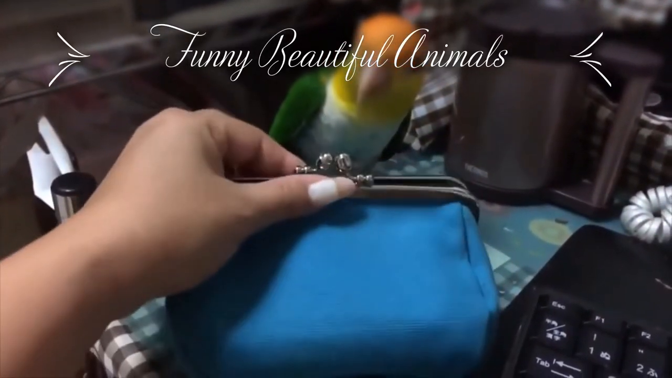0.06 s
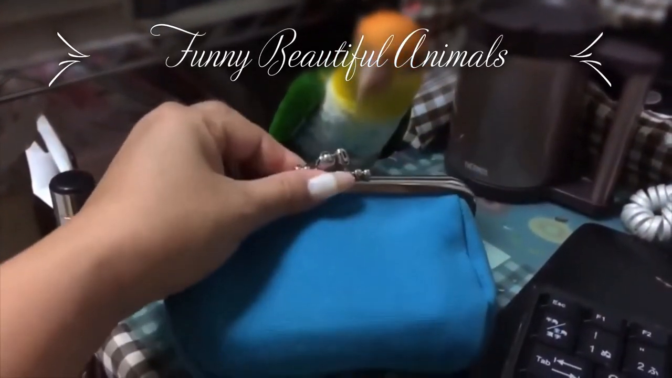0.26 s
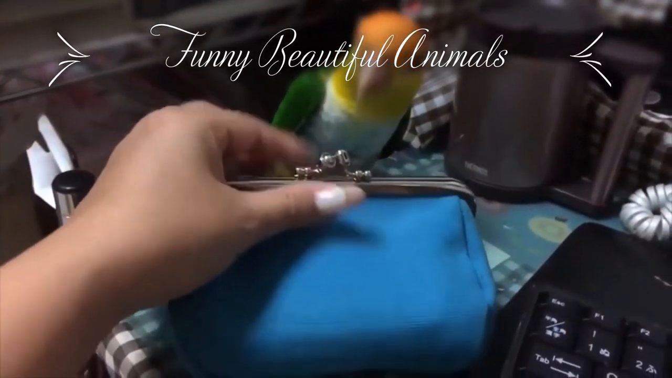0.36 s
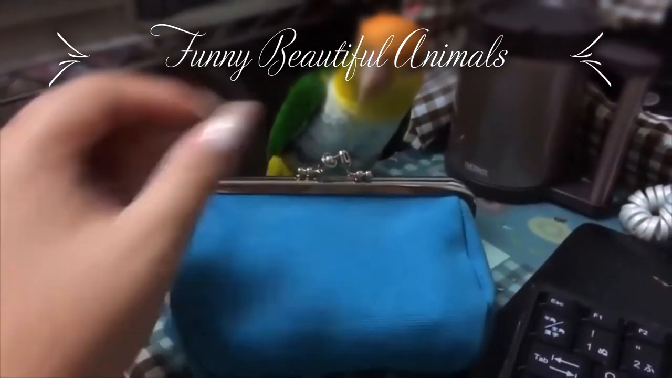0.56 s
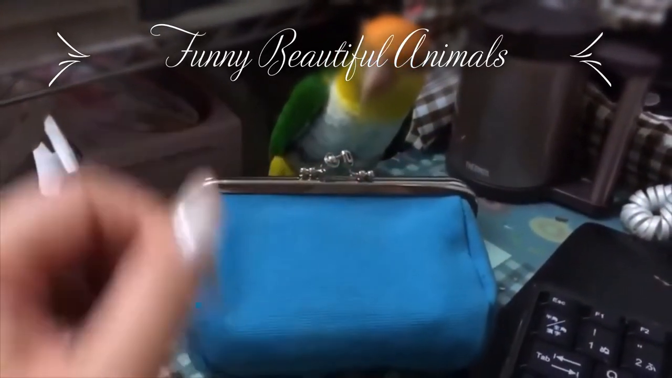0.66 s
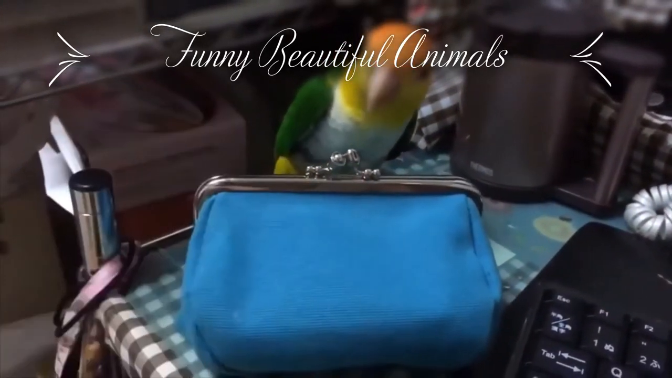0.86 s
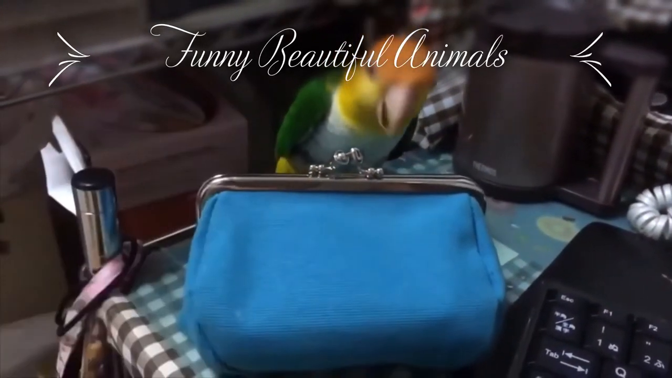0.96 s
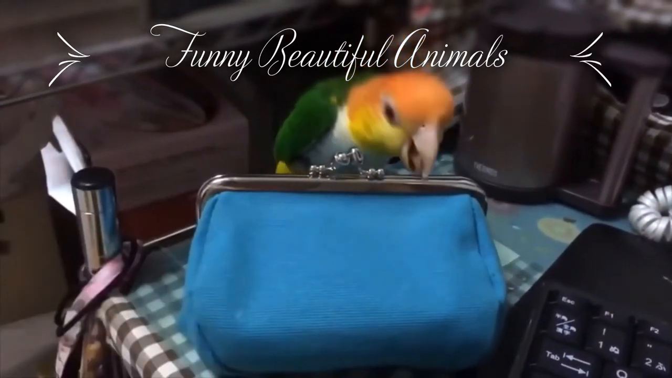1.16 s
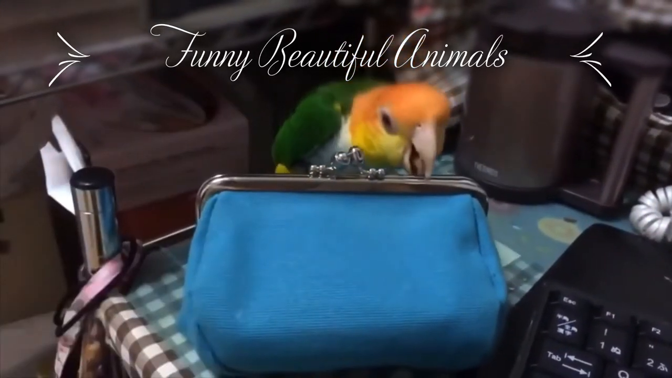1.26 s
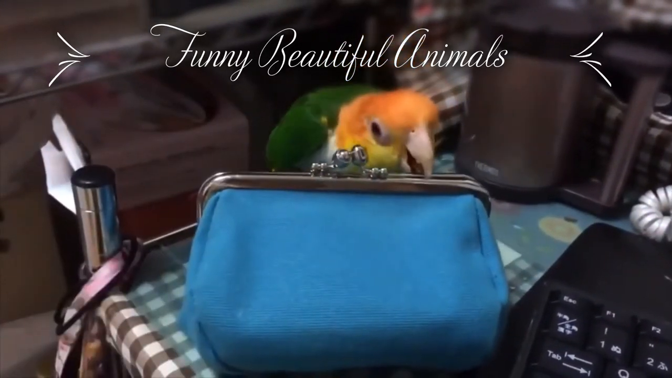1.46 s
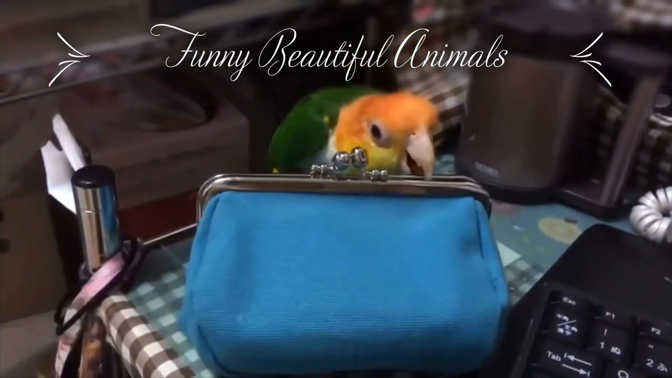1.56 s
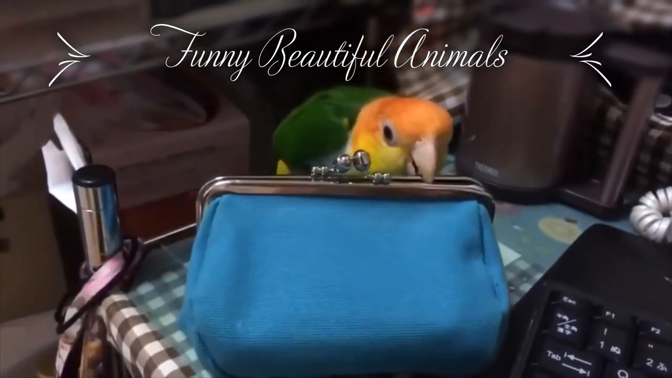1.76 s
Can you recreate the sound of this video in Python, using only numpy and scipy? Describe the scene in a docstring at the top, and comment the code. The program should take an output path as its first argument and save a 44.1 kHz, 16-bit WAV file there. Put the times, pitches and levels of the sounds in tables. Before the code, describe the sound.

A metal purse clasp ticks under fingers, then snaps shut with one loud, bright crack and short rattle; about a second later come faint ticks as a parrot touches it. Close microphone, small furnished room, low fan hum.

```python
"""A fan motor hums low over its airflow noise while the metal clasp of a cloth purse ticks under fingers.
The clasp scrapes, snaps shut and rattles, and later ticks faintly as a small parrot touches it.
Contacts are sums of dying sines, and a small furnished room answers them with fading noise.
The hum is a few wavering tones; airflow and one soft rustle are shaped noise."""
import sys
import numpy as np
from scipy import signal
from scipy.io import wavfile
from scipy.ndimage import uniform_filter1d

SR = 44100
rng = np.random.default_rng(int(sys.argv[2]) if len(sys.argv) > 2 else 0)


def generate_wav(sig):
    """Save sig (samples, or channels by samples) to the path in sys.argv[1] as 16-bit PCM at SR."""
    pcm = np.round(np.clip(np.atleast_2d(sig).T, -1, 1) * 32767).astype(np.int16)
    wavfile.write(sys.argv[1], SR, pcm)


def level_to_linear(level):
    """Convert decibel levels to linear amplitude factors, elementwise."""
    exponent = np.asarray(level, float) / 20
    return 10 ** exponent


N = 79380  # length in samples

# Lasting rings of the clasp frame. Each row: pitch in Hz, level in dB, time to fall by 60 dB in seconds.
FRAME_RINGS = [(1000, -34.5, .14), (2092, -36, .13), (2210, -38.5, .14), (2440, -33.5, .12),
               (3400, -32, .13), (4100, -32.5, 0.14), (4600, -35, 0.098), (5100, -35.5, .11),
               (5700, -36.5, .11), (7270, -40, .11), (8500, -34, .10), (9250, -36, .09),
               (10800, -34.5, .13), (14000, -37.5, .08)]


def evened(x):
    """Scales a sound to an rms (average strength) of 1."""
    return x / np.sqrt(np.mean(x ** 2) + 1e-20)


def read(points, hz):
    """Reads a table at any pitch, on a log-frequency axis."""
    table_hz, value = np.transpose(points)
    return np.interp(np.log(hz + 1), np.log(table_hz + 1), value)


def add(mix, start_s, sound):
    """Mixes a sound in at its start time."""
    part = mix[round(start_s * SR):][:len(sound)]
    part += sound[:len(part)]


def hum():
    """Motor hum: tones at multiples of one wavering pitch, each fluttering a little in level."""
    # Path of the hum. Each row: time in seconds, base pitch in Hz, level in dB.
    hum_path = [(0.0, 59.8, -53.5), (0.034, 59, -47), (0.09, 58.68, -58), (0.124, 58.44, -48),
                (0.2, 58.81, -51.5), (0.223, 58.58, -46.5), (0.26, 58.6, -61), (0.28, 58.4, -46),
                (0.3, 58.56, -70), (0.334, 58.7, -54.5), (0.38, 58.3, -65), (0.55, 58.58, -55),
                (0.586, 58.44, -61), (0.6, 58.6, -57.5), (0.696, 58.8, -59.5), (0.746, 58.72, -50),
                (0.802, 58.38, -59), (0.822, 58.07, -51.5), (0.966, 58.53, -51), (1.002, 58.56, -61),
                (1.036, 58.45, -55), (1.102, 58.44, -54.5), (1.122, 58.95, -61.5), (1.258, 58.08, -61.5),
                (1.272, 59.65, -70), (1.308, 58.15, -54.5), (1.338, 58.33, -56.5), (1.614, 58.35, -48.5),
                (1.694, 58.64, -58.5), (1.8, 59.5, -51)]
    # Tones of the hum. Each row: multiple of the base pitch, level in dB.
    hum_orders = [(1, -0.5), (2, -10.5), (2.055, -9.5), (4.1, -20.5), (5.1, -21), (6.15, -23.5)]
    flutter_db = 2.5  # rms
    t = np.arange(N) / SR
    path_s, path_hz, path_db = np.transpose(hum_path)
    phase = 2 * np.pi * np.cumsum(np.interp(t, path_s, path_hz)) / SR
    tones = np.zeros(N)
    for multiple, order_db in hum_orders:
        slow_noise = uniform_filter1d(uniform_filter1d(rng.standard_normal(N), 900), 900)
        level = level_to_linear(order_db + flutter_db * evened(slow_noise))
        tones += level * np.cos(multiple * phase)
    return np.sqrt(2) * level_to_linear(np.interp(t, path_s, path_db)) * tones


def drifting_spectrum():
    """Random noise as frames of frequencies; patches and the whole level drift slowly."""
    patch_db, swell_db = 1.5, 0.66  # rms drift of the patches and of the whole level
    frames = N // 256 + 5
    real, imaginary, patches = rng.standard_normal((frames, 513, 3)).T
    swell = evened(uniform_filter1d(rng.standard_normal(frames), 30))
    # smooth over neighbouring pitches, then over time
    patches = evened(uniform_filter1d(uniform_filter1d(patches, 10, 0), 10, 1))
    return (real + 1j * imaginary) * level_to_linear(patch_db * patches + swell_db * swell)


def shaped(spectrum, shape):
    """Weights each frequency of the noise and turns it into sound of rms 1."""
    return evened(signal.istft(spectrum * shape[:, None], nperseg=1024, noverlap=768)[1][:N])


def air(spectrum):
    """Airflow noise plus the hollow bands that the fan housing brings out."""
    # Colour of the airflow. Each row: frequency in Hz, relative level in dB per Hz.
    air_colour = [(20, -12.5), (45, -2.5), (90, -2), (150, -8.5), (300, -11), (500, -12.5), (770, -17.5),
                  (1150, -14.5), (1900, -18), (2500, -20.5), (3100, -28.5), (6000, -32.5), (10000, -37),
                  (14600, -42), (15800, -60)]
    # Bands of the fan housing. Each row: centre in Hz, width in Hz, level in dB.
    housing_bands = [(1084, 200, -74), (1660, 37, -79), (993, 47, -79)]
    air_db = -60
    hz = np.fft.rfftfreq(1024, 1 / SR)
    out = level_to_linear(air_db) * shaped(spectrum, level_to_linear(read(air_colour, hz)))
    for centre_hz, width_hz, db in housing_bands:
        band = 1 / (1 + (2 * (hz - centre_hz) / width_hz) ** 2)
        out = out + level_to_linear(db) * shaped(spectrum, band)
    return out


def rustle(spectrum):
    """A sleeve brushing away: shaped noise that swells and fades once."""
    # Colour of the rustle. Each row: frequency in Hz, relative level in dB per Hz.
    rustle_colour = [(2000, -5), (4000, -2), (8000, 1.5), (12000, -4), (15000, -2), (15800, -24.5)]
    centre_s, half_s, peak_db = .80, .12, -80
    hz = np.fft.rfftfreq(1024, 1 / SR)
    brush = np.exp(-((np.arange(N) / SR - centre_s) / half_s) ** 4)
    return level_to_linear(peak_db) * brush * shaped(spectrum, level_to_linear(read(rustle_colour, hz)))


def ring(modes, centre_hz, reach, shift, flip=-1):
    """Dying sines whose signs may alternate; the modes near the centre pitch are favoured."""
    rise_s = 0.000055
    t = np.arange(SR // 5) / SR
    hz, db, t60 = np.transpose(modes)[:, :, None]
    near_db = -6 * (np.log2(hz / centre_hz) / reach) ** 2  # reach is in octaves
    sign = flip ** np.arange(len(modes))[:, None]
    level = sign * level_to_linear(db + near_db - 60 * t / t60)
    sines = np.sin(2 * np.pi * hz * (1 + shift) * t)
    return (1 - np.exp(-t / rise_s)) * (level * sines).sum(0)


def clasp():
    """Every contact rings the metal frame and thuds in the cloth purse."""
    # Contacts on the clasp. Each row: start in seconds, level in dB, brightest pitch in Hz,
    # thud level of the purse body in dB, thud pitch in Hz.
    blows = [(0.0174, -14, 5100, -60, 1300), (0.0177, -23, 8500, -60, 1350), (.0184, -40, 9400, -30, 1330),
             (.0220, -36, 4340, -37, 1300), (0.2043, -28, 3304, -45, 1700), (.2047, -28.5, 8100, -67, 1200),
             (.2045, -24, 4877, -46, 1700), (0.2179, -46, 8960, -62, 900), (.2296, -8.5, 10500, -26, 1200),
             (.2297, -5.5, 3500, -17.5, 1000), (.2304, -12, 7500, -25, 1200),
             (0.2312, -5.5, 3500, -35, 200), (.2307, -13, 11800, -30, 1200), (1.2346, -40, 4000, -36, 850),
             (1.2341, -51.5, 10000, -60, 790), (1.2362, -41, 2900, -33, 450), (1.269, -34, 5500, -56, 900),
             (1.2685, -46, 11000, -60, 900), (1.2694, -33, 3700, -38, 500), (1.2702, -37, 4300, -60, 900),
             (1.2710, -32, 2500, -29, 850), (1.3504, -45.5, 6500, -63, 900), (1.3503, -52, 11500, -66, 900),
             (1.3512, -41.5, 2370, -56, 900), (1.431, -50, 5500, -68, 900), (1.72, -56, 3000, -61.5, 900)]
    # Clasp frame, damped by cloth and fingers.
    # Each row: pitch in Hz, level in dB, time to fall by 60 dB in seconds.
    clasp_modes = [(2370, -9, .008), (3500, -3.5, .009), (4210, -10.5, 0.0071), (4650, -13, .005),
                   (5150, -7, 0.0057), (5830, -18, 0.007), (6560, -16, 0.0076), (7200, -11, .007),
                   (8100, -9.5, .007), (9400, -8, 0.005), (10500, -12, .005), (11800, -10, .006),
                   (12900, -11, .005), (14500, -12, .004)]
    # Purse body. Each row: pitch in Hz, level in dB, time to fall by 60 dB in seconds.
    body_modes = [(1700, -8, .006), (1310, -4.5, 0.0075), (950, -8, .008), (700, -11, 0.0048),
                  (450, -2, 0.013), (225, -12, .02), (90, -16.5, 0.029)]
    detune = .008  # random spread of each damped mode's pitch (fraction), drawn anew for every contact
    hard_db, hard_reach, soft_reach = -12.5, 1.1, 0.44  # hard contacts excite more octaves
    held_ring_db = -6  # a grip mutes the lasting rings
    thud_reach = .75  # the cloth answers in a narrower range
    out = np.zeros(N)
    shifts = detune * rng.standard_normal((len(blows), len(clasp_modes), 1))
    for (start_s, db, hz, thud_db, thud_hz), shift in zip(blows, shifts):
        reach = hard_reach if db > hard_db else soft_reach
        damped = ring(clasp_modes, hz, reach, shift)
        lasting = level_to_linear(held_ring_db) * ring(FRAME_RINGS, hz, reach, 0)
        thud = ring(body_modes, thud_hz, thud_reach * reach, 0, flip=1)
        add(out, start_s, level_to_linear(db) * (damped + lasting) - level_to_linear(thud_db) * thud)
    return out


def scrape():
    """The knobs scrape over each other before the snap: tiny random slips tap the frame."""
    start_s, length_s, db = .2045, 0.018, -53
    pitch_hz, width_hz, slips_per_s = 1750, 620, 2500
    chance, size = rng.random((2, round(.04 * SR)))
    t = np.arange(len(chance)) / SR
    slips = (chance < slips_per_s / SR) * (2 * size - 1)
    tap = np.exp(-np.pi * width_hz * t) * np.sin(2 * np.pi * pitch_hz * t)
    taps = evened(np.convolve(slips, tap)[:len(t)])
    out = np.zeros(N)
    add(out, start_s, level_to_linear(db) * taps * (t < length_s))
    return out


def press():
    """The frame halves are pressed together before the snap: short, lopsided pressure humps."""
    # Pushes. Each row: start in seconds, length in seconds, level in dB.
    pushes = [(0.2182, .0022, -37.5), (0.2206, .0026, -32.5)]
    out = np.zeros(N)
    for start_s, length_s, db in pushes:
        u = np.arange(0, 1, 1 / (length_s * SR))
        add(out, start_s, level_to_linear(db) * np.sin(np.pi * u ** 2))
    return out


def crack():
    """The two knobs jump past each other: one pressure pulse, a dip between two humps."""
    centre_s, db, pitch_hz = .2300, -11, 1300
    u = (np.arange(N) / SR - centre_s) * np.pi * pitch_hz
    return -level_to_linear(db) * (1 - 2 * u ** 2) * np.exp(-u ** 2)


def decay(colour, build_s):
    """Half a second of dense noise that builds up, then dies at the room's pace in each band."""
    # Fading of the room. Each row: frequency in Hz, time to fall by 60 dB in seconds.
    room_t60 = [(150, .09), (500, 0.13), (1200, 0.16), (2300, 0.18), (5000, 0.17), (10000, .165),
                (15000, 0.13)]
    hz, t, noise = signal.stft(rng.standard_normal(SR // 2), SR, nperseg=128)
    level_db = read(colour, hz)[:, None] - 60 * t / read(room_t60, hz)[:, None]
    tail = signal.istft(noise * level_to_linear(level_db), SR, nperseg=128)[1]
    return tail * (1 - np.exp(-np.arange(len(tail)) / SR / build_s))


def room(hits):
    """Faint reflections: every contact is answered by the same fading noise."""
    room_db, build_s = -22, .004
    tail = decay([(100, 0.5), (15000, 0), (15400, -40.5)], build_s)
    return signal.fftconvolve(hits, level_to_linear(room_db) * tail / np.linalg.norm(tail))[:N]


def shudder():
    """Frame and purse shudder after the snap: a grainy rattle swells, then dies with the room."""
    # Colour of the rattle. Each row: frequency in Hz, relative level in dB per Hz.
    shudder_colour = [(88, -52.5), (150, -22.5), (622, -16.5), (686, -10), (833, -21.5), (1330, -3),
                      (1590, -15.5), (2210, -1.5), (2840, -13.5), (3460, -7.5), (5000, -12), (6700, -16.5),
                      (8310, -10.5), (11000, -12.5), (15000, -16.5), (15400, -61)]
    start_s, db, build_s, grain_db = .231, -39, 0.0091, 2.5
    peak_s, half_s, swell_peak_db = .042, .018, 3.5  # loose parts keep the rattle up for a while
    ring_db = -9  # share of the rattle that keeps exciting the lasting rings
    tail = decay(shudder_colour, build_s)
    t = np.arange(len(tail)) / SR
    swell_db = swell_peak_db * np.exp(-((t - peak_s) / half_s) ** 2)
    grain = evened(uniform_filter1d(rng.standard_normal(len(tail)), 70))
    rattle = tail * level_to_linear(swell_db + grain_db * grain)
    frame = ring(FRAME_RINGS, 4000, 3, 0)[:SR // 20]
    rings = signal.fftconvolve(rattle, frame)[:len(tail)]
    both = evened(rattle) + level_to_linear(ring_db) * evened(rings)
    out = np.zeros(N)
    add(out, start_s, level_to_linear(db) * evened(both))
    return out


def scene():
    """Clasp in the room over hum, airflow and a rustle, as one channel."""
    spectrum = drifting_spectrum()
    background = hum() + air(spectrum) + rustle(spectrum)
    hits = clasp() + scrape() + press() + crack()
    return (background + hits + room(hits) + shudder())[None]


def roll_off(x):
    """The treble ends steeply here."""
    return signal.sosfilt(signal.butter(12, 16660, fs=SR, output="sos"), x)


def record(dry):
    """Gain control lowers the sound just after loud blows and recovers slowly; deep bass is cut."""
    knee_db, duck, recover_db_per_s = -38, 0.15, 14.5  # duck: dB of cut per dB above the knee
    low_cut_hz = 39
    # the shifted averages look only at the past
    power_db = 10 * np.log10(abs(uniform_filter1d(dry[0] ** 2, 400, origin=199)) + 1e-12)
    fall_db = np.arange(N) * recover_db_per_s / duck / SR
    held_db = np.maximum.accumulate(power_db + fall_db) - fall_db  # peaks sink steadily
    over_db = np.maximum(held_db - knee_db, 0)
    cut_db = duck * uniform_filter1d(over_db, 200, origin=99)
    low_cut = signal.butter(2, low_cut_hz, "high", fs=SR, output="sos")
    mix = signal.sosfilt(low_cut, dry) / level_to_linear(cut_db)
    return roll_off(mix)


dry = scene()
out = record(dry)
generate_wav(out)
```